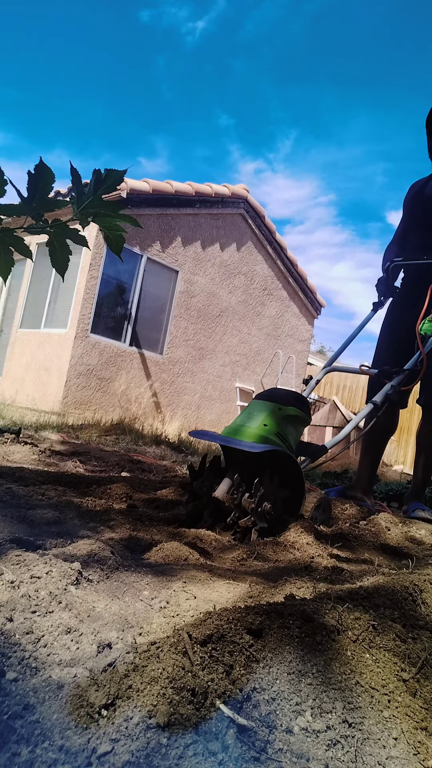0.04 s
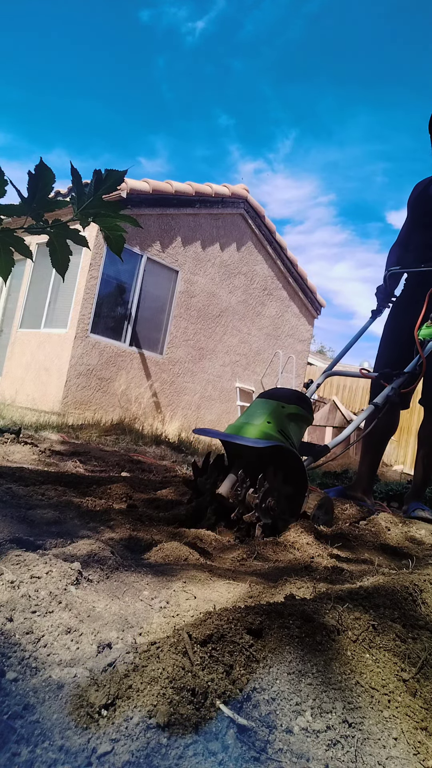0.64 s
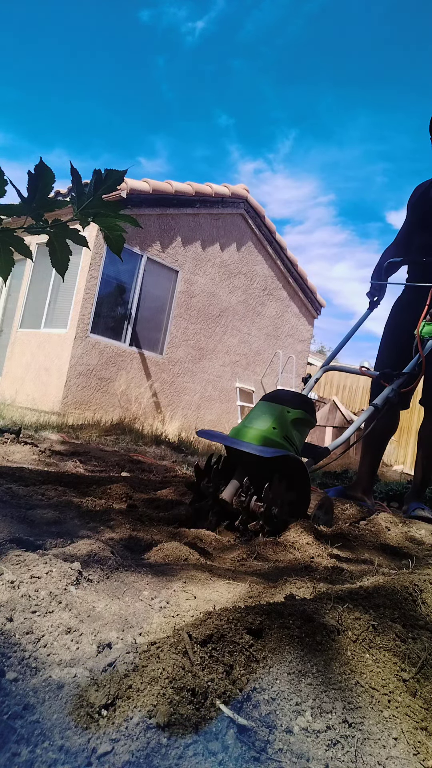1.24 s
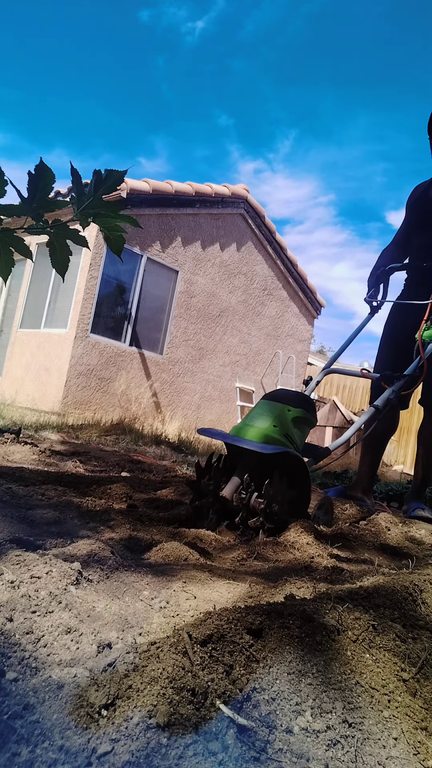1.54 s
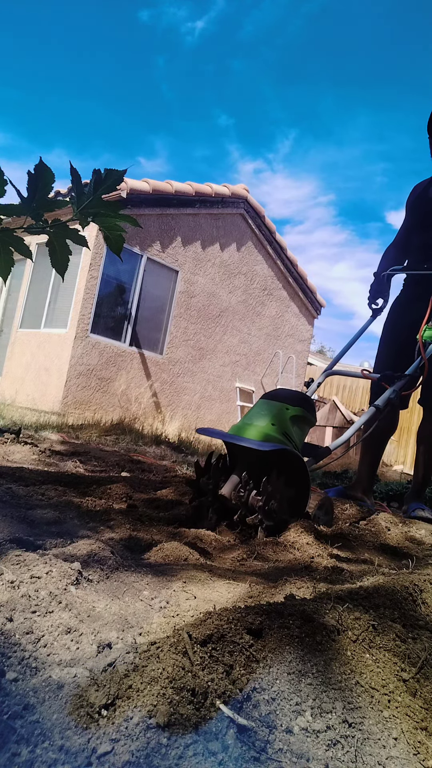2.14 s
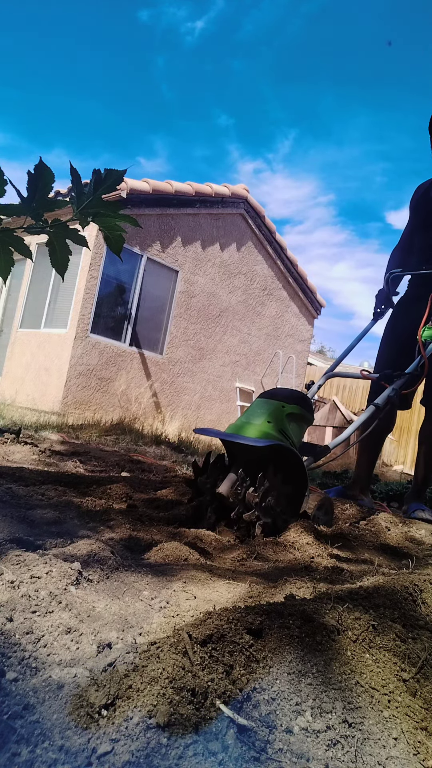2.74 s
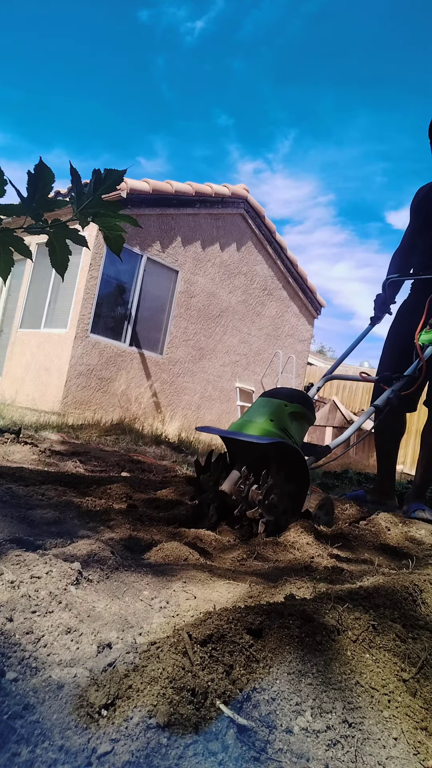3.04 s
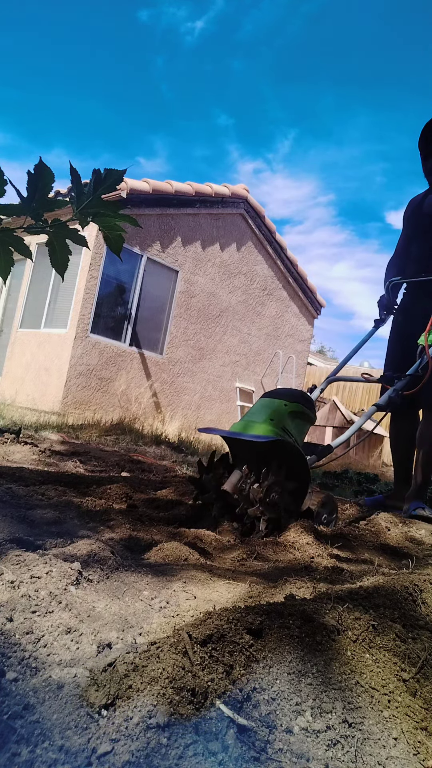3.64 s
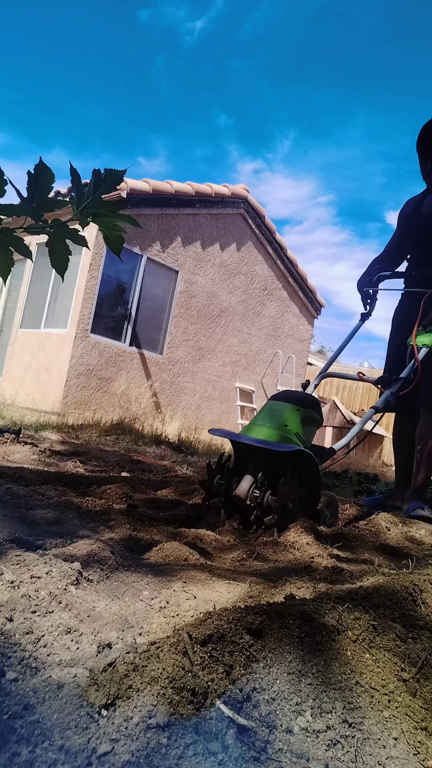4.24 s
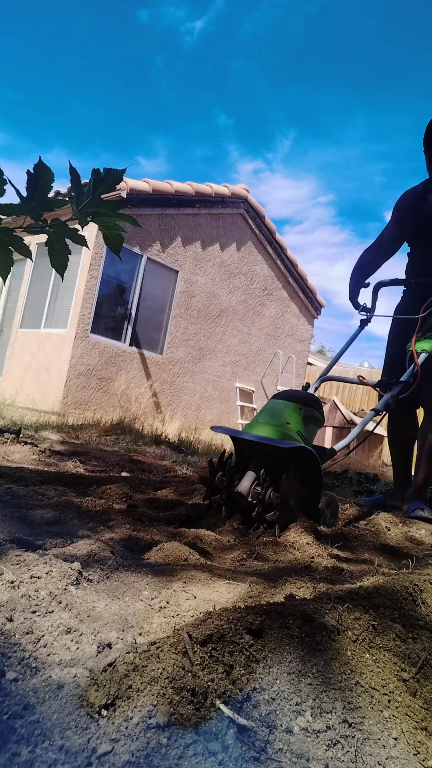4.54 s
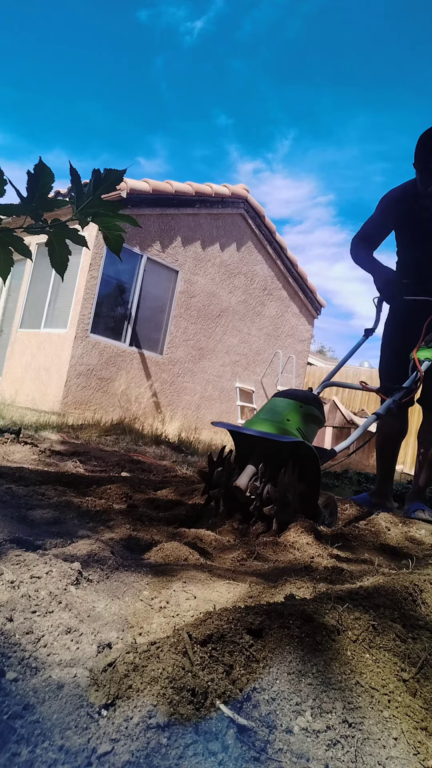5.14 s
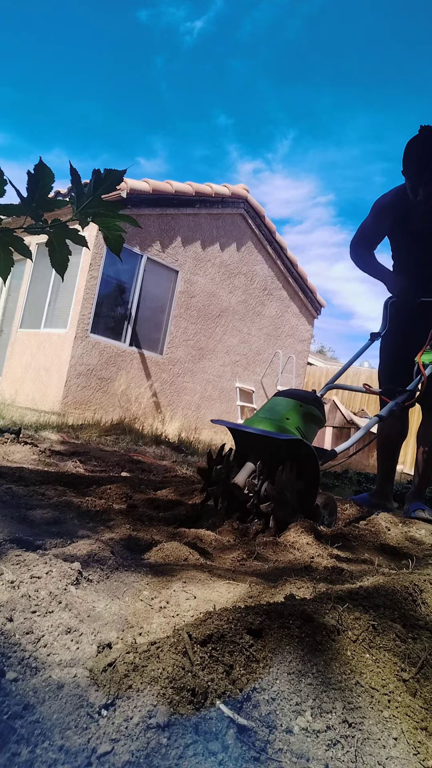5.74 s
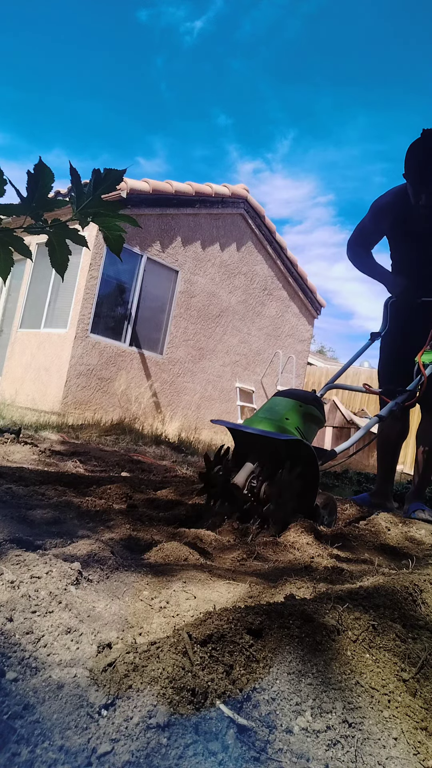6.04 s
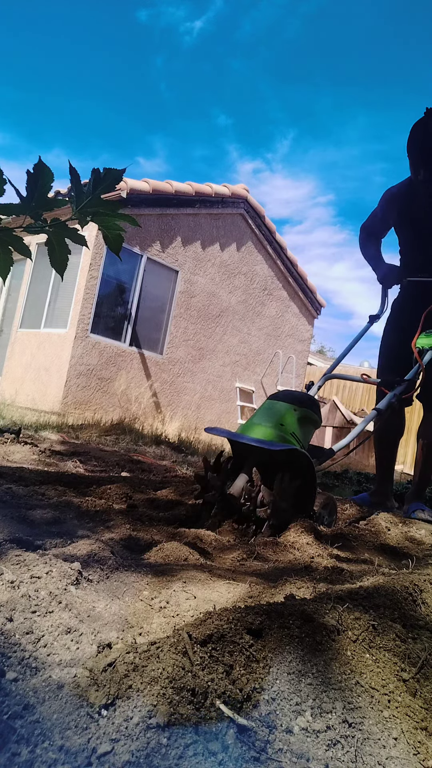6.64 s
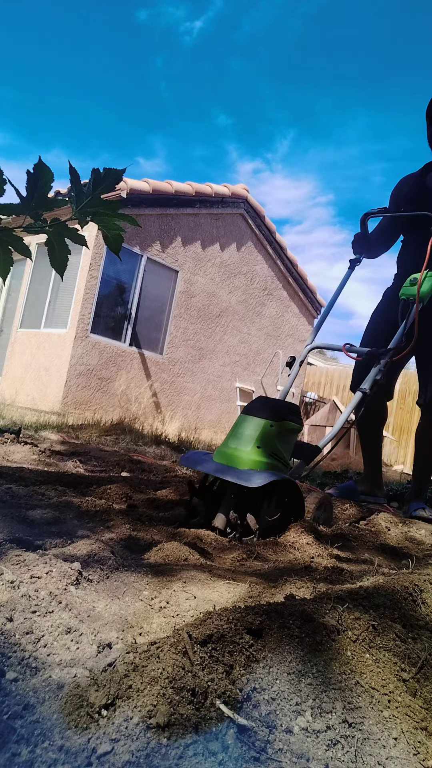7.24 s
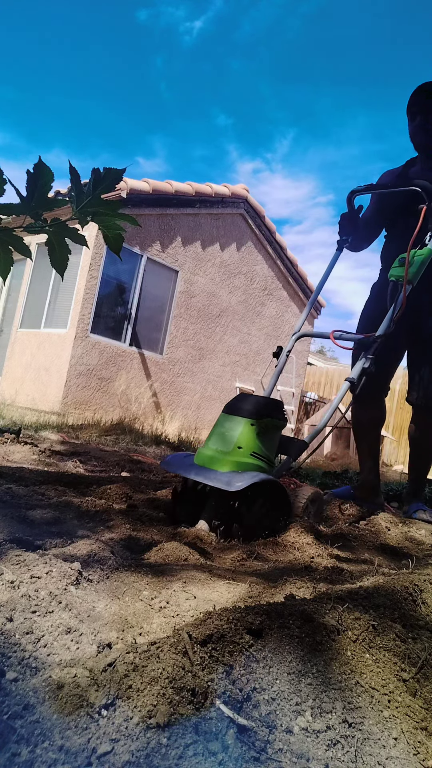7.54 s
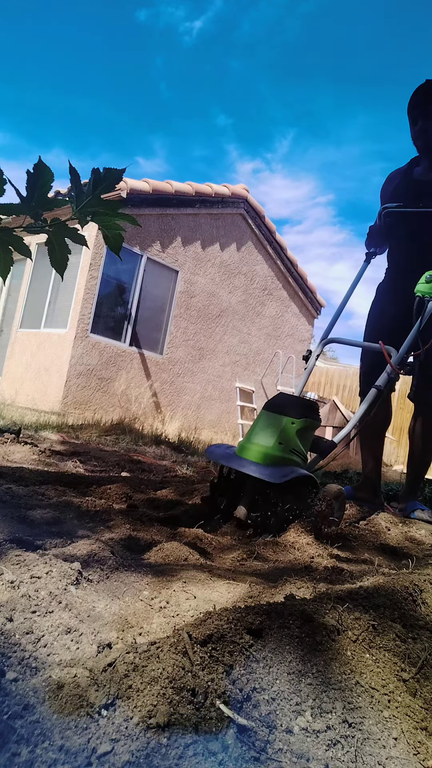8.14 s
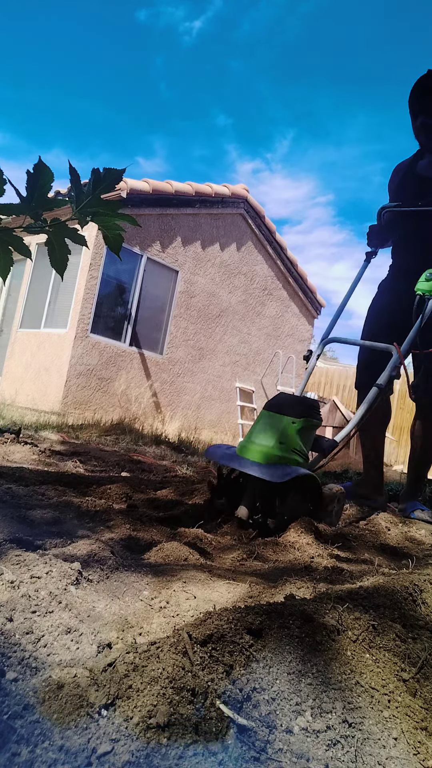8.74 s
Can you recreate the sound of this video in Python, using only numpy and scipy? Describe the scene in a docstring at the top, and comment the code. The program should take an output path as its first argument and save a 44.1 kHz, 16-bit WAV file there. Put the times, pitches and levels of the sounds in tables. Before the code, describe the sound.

Light ticks, ringing clanks and small squeaks come from the frame of a nearby garden tiller being moved on gritty soil, with a faint bird and a far low rumble behind. Then the electric motor starts suddenly, much louder, and winds up to a whine with chattering gears. Its pitch drops as it digs, with dull thuds, spraying dirt and a few sharp stone hits, outdoors in a yard.

```python
"""An electric tiller snaps on: its pinion whines up through the ring of the gear case, then sags as the
tines bite dry soil and throw grit. Before it starts, the machine is shifted about a backyard: contacts
set its frame ringing, soil crunches under it, and dry joints squeak by stick-slip friction.
A bird chirps, a distant town rumbles underneath, and walls and fence return a short echo."""
import sys
import numpy as np
from scipy import signal
from scipy.fft import rfft, irfft, next_fast_len
from scipy.io import wavfile
from scipy.ndimage import map_coordinates

SR = 44100
rng = np.random.default_rng(int(sys.argv[2]) if len(sys.argv) > 2 else 0)


def materialize(psi):
    """Save the field psi as 16-bit PCM at rate SR to the path in sys.argv[1].

    A 1-D psi becomes a single channel; in a 2-D psi each row is a channel.
    """
    bounded = np.clip(np.atleast_2d(psi).T, -1, 1)
    quanta = np.round(bounded * 32767).astype(np.int16)
    wavfile.write(sys.argv[1], SR, quanta)


N = 387190

# Likeness of the two ears: (frequency [Hz], coherence [0-1])
EAR_COHERENCE = [(400, 0.99), (700, 1), (1290, 0.23), (2380, 1), (3500, 1), (5000, 0.12), (8000, 0.63),
                 (14000, 0.033)]
# Balance of the ears: (frequency [Hz], left minus right [dB])
EAR_BALANCE = [(60, -5), (110, 3), (200, 0), (380, -1.5), (700, -5), (1290, -1.5), (2380, 0), (4400, 3),
               (8120, 1), (15000, -3)]
# Reverberation of the yard: (frequency [Hz], 60 dB decay time [s])
YARD_DECAY = [(200, 0.14), (3000, 0.19), (12000, 0.051)]

# Spectra of the noise sources: (frequency [Hz], relative level [dB])
TOWN_SPECTRUM = [(13, -68), (22, -30.5), (49, -4.5), (90, -4), (169, -4), (263, -11.5), (398, -16),
                 (432, -16.5), (1540, -39), (2140, -46.5), (2980, -47), (3810, -49.5), (8000, -67),
                 (16000, -80)]
SCRAPE_SPECTRUM = [(400, -31.5), (650, 3), (900, -6.5), (1250, 3.5), (1900, 1), (2600, 1), (3800, -2),
                   (5000, 0.5), (7500, -24), (14000, -36), (16000, -7.5)]
BUMP_SPECTRUM = [(100, -27.5), (200, -8), (280, 6), (400, -9.5), (600, -7), (900, -20), (2000, -35)]
CONTACT_SPECTRUM = [(500, -39.5), (1500, -9), (2600, -0.5), (4200, -4.5), (6000, -10.5), (7500, -8.5),
                    (12000, -19)]
KNOCK_SPECTRUM = [(200, -29.5), (600, -23.5), (1000, 7.5), (1400, -10), (2500, -2.5)]
SNAP_SPECTRUM = [(3000, -43.5), (6500, 6), (9000, 3.5), (12000, 1.5), (14500, 2), (16000, 10.5)]
GRIT_SPECTRUM = [(2350, -21.5), (4000, -2.5), (4870, -6), (5670, -6), (7230, -18.5), (8750, -10.5),
                 (9770, -17), (10600, -10), (12300, -14.5), (14000, -10), (16000, -12)]
THUD_SPECTRUM = [(70, -36), (120, -21.5), (170, -14.5), (220, 0), (280, -3), (340, -5), (600, -38.5)]
SPARK_SPECTRUM = [(7000, -35), (10500, -10), (12500, -8), (14500, 1), (16000, -5)]
HOOD_SPECTRUM = [(150, -47), (260, -16), (416, 1), (514, -7), (595, -5), (679, -14), (822, -11.5),
                 (938, -19.5), (1140, -17.5), (1500, -26.5), (1950, -50), (3300, -120)]
CHATTER_SPECTRUM = [(500, -46.5), (900, -3.5), (1150, -8.5), (1450, -10.5), (1900, -5), (2250, -2.5),
                    (2800, -5), (3400, 5), (3900, -11), (4800, -14), (5400, -15.5), (6400, -9),
                    (7300, -38.5), (12000, -55)]

# Resonances of far machinery and of the tiller: (frequency [Hz], bandwidth [Hz], relative level [dB])
DRONE_MODES = [(56.3, 3.5, -1.5), (128.6, 2.3, 4)]
FRAME_MODES = [(1330, 26, -2.5), (2480, 70, 0.5), (2700, 130, 0.5), (3050, 150, 5), (3520, 110, 2),
               (4450, 80, -14), (5500, 200, -2)]
HOOD_MODES = [(1020, 16, 1.5), (1100, 40, -5.5), (920, 46, 3), (1420, 70, -6), (605, 44, -5)]
HOUSING_MODES = [(735, 12, -3), (1171, 26, -6), (1610, 22, -4.5), (1786, 45, -9.5), (2172, 28, -5.5),
                 (2249, 29, -3.5), (2336, 28, -9.5), (2563, 32, -4.5), (2676, 70, -9.5), (2990, 11, -1.5),
                 (3204, 40, -6.5), (4106, 46, -5.5), (4530, 25, -7.5), (5230, 120, -14.5), (6470, 53, -14)]
GEAR_CASE_MODES = [(3540, 28, 26), (3605, 36, 21), (3605, 35, 16.5), (3430, 50, 13)]

# Bird chirps: (time [s], starting pitch [Hz], level [dB])
BIRD_CHIRPS = [(.668, 3650, -55.5), (0.8, 4100, -56), (4.945, 3900, -56)]
# Notes within a chirp: (delay [s], pitch [ratio], relative level [dB])
CHIRP_VOICES = [(0, 1, 1), (-.002, .87, 0), (-0.024, 1.44, -8), (-0.026, 1.29, -9)]
# Nearly level bird notes: (time [s], length [s], pitch [Hz], level [dB])
BIRD_PEEPS = [(.504, 0.024, 2127, -34.5), (2.785, 0.026, 2120, -54)]
# Slipping dry joints: (time [s], length [s], pitch [Hz], level [dB])
JOINT_SQUEAKS = [(1.281, 0.036, 1051, -34.5), (1.333, 0.045, 1044, -43), (1.43, 0.053, 1380, -47),
                 (1.884, 0.04, 4860, -37), (1.907, 0.074, 5280, -34.5), (1.938, 0.093, 5100, -36.5),
                 (1.99, 0.18, 4840, -52), (2.072, 0.14, 1815, -49), (2.144, 0.11, 2420, -41.5),
                 (2.15, 0.12, 3080, -48), (2.16, .09, 3760, -50), (2.235, 0.066, 2850, -43),
                 (2.17, 0.074, 1660, -48), (2.212, 0.14, 1297, -41), (3.881, 0.029, 1600, -47),
                 (4.229, 0.046, 1530, -52), (5.328, 0.17, 1373, -44), (5.35, 0.1, 2530, -46),
                 (5.42, 0.084, 676, -43)]
# Shoves over the soil: (peak time [s], 60 dB rise [s], 60 dB fall [s], crunch [dB], sand [dB])
SOIL_SHOVES = [(0.01, 0.18, 0.059, -38, -38), (1.19, 0.33, 0.55, -54, -61), (1.57, 0.093, 1.15, -48, -60),
               (2.3, 0.6, 0.31, -36, -65), (3.04, 0.84, 1.3, -58, -74), (3.53, 0.23, .25, -66, -66),
               (3.88, 0.85, 1, -57.5, -57), (4.26, 0.18, 0.19, -63.5, -51.5),
               (4.68, 0.54, 1.18, -44.5, -56), (5.27, 0.21, 0.2, -47, -83), (5.46, 0.21, 0.15, -30.5, -50)]
# The tines drop on the soil: (time [s], level [dB])
TINE_DROPS = [(2.35, -25), (4.677, -28), (5.467, -25)]
# Contacts on the frame, by handling and later by stones:
# (time [s], strength [dB], relative knock [dB], relative snap [dB], ring pitch [Hz], scuff length [s])
FRAME_CONTACTS = [(0.013, -23.5, -23, 3, 3090, 0.0039), (0.9057, -13.5, -39, -4.5, 2970, 0.0028),
                  (0.975, -30, -6, -14, 3440, .004), (1.023, -22, -31, -31, 3150, 0.017),
                  (1.041, -22, -25, -14, 2700, 0.0052), (1.295, -9, -14.5, -13, 2290, 0.0012),
                  (1.407, -24.5, -38, -16, 2710, .003), (1.469, -36, -33, -16, 2260, 0.0035),
                  (1.562, -35, -25, -20, 3100, .003), (1.596, -9.5, -32, -3, 3470, 0.01),
                  (1.6047, -5, -21, -32, 2563, 0.014), (1.6855, -13.5, -14, -2.5, 3460, 0.014),
                  (1.706, -15.5, -23, -24, 2970, .005), (1.7692, -14.5, -12.5, -16, 2990, 0.0084),
                  (1.791, -22.5, -30, -25, 3650, 0.0045), (2.23, -15, -28, -13, 2700, 0.002),
                  (2.256, -11.5, -13, -5, 2990, 0.00088), (2.306, -14.5, -6, 0, 2800, 0.0008),
                  (2.337, -12.5, -11, -15, 3010, 0.01), (2.3517, -8.5, -30, -22, 2535, .006),
                  (3.184, -25.5, -35, -19, 2470, .005), (3.2182, -13, -24, -19, 2750, 0.0033),
                  (3.444, -38.5, -40, -20, 3830, 0.01), (4.025, -27.5, -32, -17, 3050, 0.0046),
                  (4.05, -22, -38, -17, 2250, .004), (4.0604, -20, -30, -17, 2530, 0.0085),
                  (4.1, -22.5, -12, 1.5, 2700, 0.0039), (4.143, -30.5, -35, -23, 3150, 0.013),
                  (4.376, -28.5, -39, -17, 2360, 0.011), (4.52, -6.5, -16, -16.5, 3090, 0.0075),
                  (4.532, -0.5, -9.5, -29, 4020, 0.015), (4.545, -5, -12.5, -25, 2870, 0.013),
                  (4.629, -16, -11, -2, 3400, 0.016), (4.646, -12, -20, 0, 2980, 0.018),
                  (4.677, -5, -11, -14.5, 2850, 0.0034), (4.737, -12.5, -22, -1.5, 2570, 0.015),
                  (4.765, -24.5, -30, -25, 3000, 0.0054), (4.823, -18, -33, 0.5, 3580, 0.014),
                  (4.868, -25, -25, -20, 2990, 0.0054), (4.885, -24, -25, -25, 3600, 0.0066),
                  (5.1381, -14.5, -28.5, -31, 2570, 0.0062), (5.197, -26.5, -35, -17, 3000, 0.0055),
                  (5.235, -18.5, -38, -10, 3400, 0.0019), (5.271, -33, -30, -28, 2080, 0.011),
                  (5.3994, -8, -37, -2, 2510, 0.0044), (5.469, -12, -16, -21, 2860, 0.0079),
                  (5.91, -9, -19, -13, 3660, 0.0076), (7.212, -0.5, -25, -10, 3740, .02),
                  (8.107, 1, -25, -10, 3270, .02), (8.616, 1, -29, -2.5, 3550, 0.033)]
# Modes of a struck part: (multiple of its ring pitch [ratio], level [dB], 60 dB decay time [s])
PART_MODES = [(.56, -9.5, 0.055), (1, -0.5, 0.047), (1.27, 2, 0.017), (1.68, 3, 0.015), (2.15, -9, 0.02)]
# Tines strike clods: (time [s], half-width [s], thud boost [dB], gear knock boost [dB], hood boost [dB])
CLOD_STRIKES = [(6.424, 0.033, 9.5, 3.5, -5), (7.28, 0.033, 2, 5, 1.5), (7.625, 0.095, 4, 11.5, -1),
                (7.99, 0.15, 1.5, 12.5, -1), (8.667, 0.11, 7.5, 2.5, 1.5)]
# Magnetic hum of the stator: (frequency [Hz], level [dB])
HUM_PARTIALS = [(359.6, -28), (484.3, -37), (120, -59)]
# How the housing radiates the pinion's whine: (frequency [Hz], gain [dB])
WHINE_RESPONSE = [(1950, -36), (2130, -30), (2240, -15.5), (2345, -13.5), (2430, -25), (2600, -21.5),
                  (2790, -25.5), (2980, -21), (3150, -21.5), (3400, -23), (3530, -13.5), (3620, -17),
                  (3730, -33)]
# The motor spins up freely, then sags as the tines dig in: (time [s], speed [turns/s])
SHAFT_SPEED = [(5.92, 262), (6.1, 322), (6.2, 368), (6.3, 405), (6.5, 450), (6.7, 480), (6.85, 488),
               (7.0, 488), (7.15, 483), (7.3, 466), (7.46, 446), (7.6, 408), (7.75, 393), (7.9, 408),
               (8.02, 403), (8.14, 391), (8.5, 384), (8.69, 343), (8.78, 329)]
# Growth with shaft speed: (part [name], rise per doubling [dB])
DB_PER_DOUBLING = {"chatter": 6.5, "case": 8.5, "thud": 13.5, "grit": 10.5, "knock": 15}

START_S, SKIM_S, DIG_S = 5.918, 6.79, 7.25  # the switch closes; the tines touch the soil; they dig in
PINION_TEETH, RUNNING_HZ, TORQUE_PULSE_HZ = 7, 453, 120  # the torque pulses every mains half cycle


def amp(db):
    """Amplitude grows tenfold every 20 dB."""
    return 10 ** (np.asarray(db) / 20)


def unit(x):
    """Normalisation to an rms of 1."""
    return x / np.sqrt(np.mean(x ** 2) + 1e-20)


def clock():
    """Uniform sampling: the time of each sample in seconds."""
    return np.arange(N) / SR


def along(points, hz):
    """Interpolation of (frequency, value) points on a logarithmic frequency axis."""
    f, v = np.transpose(sorted(points))
    return np.interp(np.log(hz + 1), np.log(f + 1), v)


def wobble(rate):
    """Smooth random modulation with rate knots a second."""
    knots = rng.standard_normal(int(N * rate / SR) + 4)
    return map_coordinates(knots, [np.arange(N) * rate / SR])


def swell(s, rise, fall):
    """Exponential growth and decay about a peak at s; rise and fall are the times for 60 dB."""
    t = clock() - s
    return amp(-60 * np.minimum(np.maximum(-t / rise, t / fall), 2))


def impacts(rate, spread_db):
    """Shot noise: two independent trains of random impacts with log-normal sizes."""
    hit = rng.random((2, N)) < rate / SR
    return unit(hit * rng.choice([-1, 1], (2, N)) * amp(spread_db * rng.standard_normal((2, N))))


def filtered(x, response):
    """Linear filtering: the spectrum of x is multiplied by a frequency response."""
    size = next_fast_len(N + SR // 4, True)
    return irfft(rfft(x, size) * response(np.fft.rfftfreq(size, 1 / SR)), size)[..., :N]


def coloured(x, spectrum, size=2048):
    """Minimum-phase filtering: a causal kernel of unit energy imposes the spectrum."""
    level_db = np.maximum(along(spectrum, np.fft.rfftfreq(size, 1 / SR)), -90)
    cepstrum = irfft(np.log(amp(level_db)))
    cepstrum[1:size // 2] *= 2
    cepstrum[size // 2 + 1:] = 0
    kernel = irfft(np.exp(rfft(cepstrum)))
    return signal.oaconvolve(x, kernel[None] / np.linalg.norm(kernel), axes=1)[:, :N]


def resonate(x, modes):
    """Modal superposition: x drives damped resonators in parallel, at unit energy gain."""
    def response(f):
        h = sum(amp(db) * 1j * f * width / (hz * hz - f * f + 1j * f * width) for hz, width, db in modes)
        return h / np.sqrt(np.mean(np.abs(h) ** 2))
    return filtered(x, response)


def resonance(hz, centre_hz, width_hz):
    """Forced response of a single mode, 1 at its centre."""
    return 1 / np.hypot(1, 2 * (hz - centre_hz) / width_hz)


def placed(pair, left_lag_s):
    """Interaural coherence, level and delay turn two signals into the tiller's stereo image."""
    def mid_side_gains(hz):
        turn = np.arccos(np.clip(along(EAR_COHERENCE, hz), 0, 1)) / 2
        return np.array([np.cos(turn), np.sin(turn)])

    def ear_gains(hz):
        ear = np.array([[.5], [-.5]])
        return amp(along(EAR_BALANCE, hz) * ear) * np.exp(-2j * np.pi * hz * left_lag_s * ear)

    mid, side = filtered(pair, mid_side_gains)
    return filtered(np.array([mid + side, mid - side]), ear_gains)


def town():
    """Long waves reach both ears nearly alike: a far rumble with a low drone of machinery."""
    noise = rng.standard_normal((4, N))
    air = filtered(noise[:3], lambda hz: amp(along(TOWN_SPECTRUM, hz)))
    diffuse = filtered(air[1:], lambda hz: along([(100, 0.096), (600, 0.34), (3000, 1.0)], hz))
    rumble = amp(-39.5 + wobble(3.78)) * unit(air[0] + diffuse)
    return rumble + amp(-50.5) * unit(resonate(noise[3], DRONE_MODES))


def yard_echo(x):
    """Reverberation: reflections from walls and fence merge into a short, exponentially fading tail."""
    hz, t, noise = signal.stft(rng.standard_normal((2, SR // 2)), SR, nperseg=256)
    tail = signal.istft(noise * amp(-60 * t / along(YARD_DECAY, hz)[:, None]), SR, nperseg=256)[1]
    tail = np.pad(tail, ((0, 0), (SR // 200, 0)))  # 5 ms of travel
    return signal.fftconvolve(x, tail / np.linalg.norm(tail[0]), axes=1)[:, :N]


def whistles(notes, fall, rough):
    """Frequency modulation: each note starts level, then bends ever faster by the share fall."""
    song = np.zeros(N)
    waver = 1 + rough * wobble(900)
    for s, length, hz, db in notes:
        u = np.linspace(0, 1, max(round(length * SR), 2))
        span = round(s * SR) + np.arange(len(u))
        pitch = hz * (1 - fall * u ** 3) * waver[span]
        song[span] += amp(db) * unit(u * (1 - u)) * np.sin(2 * np.pi * np.cumsum(pitch) / SR)
    return np.array([song, song])


def bird(chirp_s=.066):
    """Superposed glides: a chirp is two falling notes just behind a fainter, higher pair; peeps rise."""
    notes = [(s + delay, chirp_s, hz * ratio, db + voice_db)
             for s, hz, db in BIRD_CHIRPS for delay, ratio, voice_db in CHIRP_VOICES]
    chirps = unit(amp(4 * wobble(250))) * whistles(notes, fall=.25, rough=.04)
    return chirps + whistles(BIRD_PEEPS, fall=-.05, rough=.025)


def squeaks(sag=0.034):
    """Stick-slip friction in dry joints: an unsteady tone over a rasp, richer when it is louder."""
    tone, rub = np.zeros((2, N))
    waver = wobble(900)
    for s, length, hz, db in JOINT_SQUEAKS:
        u = np.linspace(0, 1, max(round(length * SR), 2))
        span = round(s * SR) + np.arange(len(u))
        scatter_hz = (35 + .032 * hz) * waver[span]  # the pitch varies from slip to slip
        phase = 2 * np.pi * np.cumsum(hz * (1 - sag * u) + scatter_hz) / SR
        level = amp(db) * unit(u * (1 - u) ** 2)
        overtones = amp(19.5) * level * (np.sin(2 * phase) + amp(-9) * np.sin(3 * phase))
        tone[span] += level * (np.sin(phase) + overtones)
        rub[span] += level
    rasp = unit(coloured(impacts(900, 2.1), SCRAPE_SPECTRUM) + resonate(impacts(900, 2.8), FRAME_MODES))
    return (tone + amp(-12) * rub * rasp) * unit(amp(5 * wobble(260)))


def crumbling(relative_db=-40, t60=0.25):
    """Exponential energy decay: the envelope of the crumbs that each contact shakes loose."""
    energy = np.zeros(N)
    for s, db, *_ in FRAME_CONTACTS:
        energy[round(s * SR)] += amp(db + relative_db) ** 2
    retained = amp(-60 / (t60 * SR)) ** 2
    return np.sqrt(signal.lfilter([1], [1, -retained], energy))


def dragging():
    """Granular noise: soil crunches under shoves and contacts, sand trickles, the tines bump down."""
    crumbs = amp(2.6 * wobble(56)) * impacts(1500, 2.6)
    crunch = amp(2) * unit(coloured(crumbs, SCRAPE_SPECTRUM))
    crunch += amp(-6.5) * unit(resonate(crumbs, FRAME_MODES))
    sand = unit(coloured(impacts(2500, 2.5), SNAP_SPECTRUM))
    shoved, trickle = sum(np.outer(amp(levels_db), swell(s, rise, fall))
                          for s, rise, fall, *levels_db in SOIL_SHOVES)
    shaken = crumbling()
    drops = sum(amp(db) * swell(s, 0.0017, 0.13) for s, db in TINE_DROPS)
    bumps = drops * unit(coloured(impacts(4000, 0.82), BUMP_SPECTRUM))
    soil = np.hypot(shoved, shaken) * crunch + (trickle + amp(-7.5) * shaken) * sand + bumps
    return placed(soil, left_lag_s=-68e-6) * amp([[-1], [1]])


def contact_force(t, scuff_s, sharp_s=0.0035, rattle_t60=0.042):
    """Frictional impact: a burst of tiny slips and a fading rattle, with a crack if it is brief."""
    u = 3 * t / scuff_s
    envelope = u * np.exp(1 - u) + 0.08 * amp(-60 * t / rattle_t60) * (1 - np.exp(-u))
    slips = envelope * rng.standard_normal((2, len(t)))
    slips *= amp(3.5 * rng.standard_normal(len(t) // 16 + 1).repeat(16)[:len(t)])
    crack = 0.49 * np.exp(-scuff_s / sharp_s) * (t == t[np.argmax(envelope)])
    return slips / np.linalg.norm(slips, axis=1, keepdims=True) + crack


def clicks(mode_spread=.09):
    """Impact excitation: each contact rings the modes of the struck part, the frame and the hood."""
    t = np.arange(SR // 5) / SR
    tracks = np.zeros((4, 2, N + SR))
    ratio, mode_db, t60 = np.transpose(PART_MODES)[:, :, None]
    for s, db, knock_db, snap_db, ring_hz, scuff_s in FRAME_CONTACTS:
        blow = amp(db + 12) * contact_force(t, scuff_s)
        # the side modes differ from part to part
        hz = ring_hz * ratio * (1 + mode_spread * (ratio != 1) * rng.standard_normal(ratio.shape))
        part = np.sum(amp(mode_db - 60 * t / t60) * np.sin(2 * np.pi * hz * t), axis=0)
        rung = signal.fftconvolve(blow, part[None] / np.linalg.norm(part), axes=1)[:, :len(t)]
        onset = round(s * SR)
        tracks[:, :, onset:onset + len(t)] += [blow, amp(knock_db) * blow, amp(snap_db) * blow, rung]
    blows, knocks, snaps, parts = tracks
    ring = amp(-12.5) * resonate(blows, FRAME_MODES) + amp(-4.5) * parts[:, :N]
    knock = amp(5.5) * coloured(knocks, KNOCK_SPECTRUM) + amp(-1.5) * resonate(knocks, HOOD_MODES)
    click = amp(-7) * coloured(blows, CONTACT_SPECTRUM) + amp(6.5) * coloured(snaps, SNAP_SPECTRUM)
    return placed(ring + knock + click, left_lag_s=-68e-6) * amp([[-1.5], [1.5]])


def by_load(free, skimming, digging, settle_s=.04):
    """Three states of load, joined by ramps: the tines run free, skim the soil, then dig."""
    touched, dug = (np.clip((clock() - s) / settle_s + .5, 0, 1) for s in (SKIM_S, DIG_S))
    return free + (skimming - free) * touched + (digging - skimming) * dug


def spin_db(part, shaft_hz):
    """A power law: the level of a part rises with shaft speed, from 0 dB at running speed."""
    return DB_PER_DOUBLING[part] * np.log2(shaft_hz / RUNNING_HZ)


def clod_boosts():
    """Transient loading: each clod swells the thud, gear knock and hood in a Gaussian pulse of dB."""
    return sum(np.outer(boosts_db, np.exp(-((clock() - s) / half_width) ** 2))
               for s, half_width, *boosts_db in CLOD_STRIKES)


def brush_sparks():
    """Arcing at the brushes: a high crackle that fades as the motor gains speed."""
    return amp(-29) * swell(6.05, rise=0.89, fall=2.5) * unit(coloured(impacts(6000, 2), SPARK_SPECTRUM))


def digging(age, shaft_hz, clod_db):
    """Random impacts: the tines thud through clods and fling sprays of grit against the hood."""
    spray = amp(1.4 * wobble(60)) * (impacts(3500, 2.1) + 0.18 * impacts(120, 2))
    airborne = 1 - np.exp(-age / 0.2)
    grit_db = by_load(-28, -22.5, -19) + spin_db("grit", shaft_hz)
    thud_db = by_load(-30.5, -32.5, -26.5) + spin_db("thud", shaft_hz) + clod_db
    grit = airborne * amp(grit_db) * unit(coloured(spray, GRIT_SPECTRUM))
    return grit + amp(thud_db) * unit(coloured(impacts(600, 2.4), THUD_SPECTRUM))


def stator_hum(age):
    """Magnetic forces make the stator hum, loudest during the inrush of current."""
    inrush = 1 + 1.45 * np.exp(-age / 0.35)
    hum = sum(amp(db + 2 * wobble(10)) * np.sin(2 * np.pi * hz * clock() + .7 * wobble(18))
              for hz, db in HUM_PARTIALS)
    return np.sqrt(2) * inrush * hum


def hood_drumming(boost_db):
    """Panel radiation: the sheet hood over the tines drums under dense small impacts."""
    return amp(by_load(-19.5, -18.5, -16) + boost_db) * unit(coloured(impacts(2000, 2.26), HOOD_SPECTRUM))


def unbalance(angle, shaft_hz, boost_db):
    """Forced vibration: unbalance shakes the hood once a turn, through a resonance the soil damps."""
    level = amp(by_load(-10, -18.5, -17.5) + boost_db + 0.6 * wobble(25))
    hood = resonance(shaft_hz, centre_hz=424.6, width_hz=25)
    return level * hood * (np.sin(angle) + 0.055 * np.sin(2 * angle))


def gear_knock(angle, shaft_hz, clod_db):
    """A subharmonic: the loaded gears knock every second turn; a panel picks up the third harmonic."""
    stumble = .3 * wobble(30)
    panel = amp(2.5) * resonance(1.5 * shaft_hz, centre_hz=580, width_hz=36)
    level_db = by_load(-36.5, -28, -30.5) + spin_db("knock", shaft_hz) + clod_db + 2.5 * wobble(22)
    return amp(level_db) * (np.sin(angle / 2 + stumble) + panel * np.sin(1.5 * angle + 2 * stumble))


def backlash(angle, shaft_hz, jolt_db):
    """Backlash impacts, bunched by each turn and torque pulse, rattle the housing and ring the case."""
    pulsing = 1 + 0.06 * np.cos(2 * np.pi * TORQUE_PULSE_HZ * clock())
    bunching = (1 + 0.12 * np.cos(angle)) * pulsing * amp(0.95 * wobble(55))
    chatter = amp(-3.5) * unit(coloured(bunching * impacts(5000, 3.5), CHATTER_SPECTRUM))
    chatter += amp(-6) * unit(resonate(bunching * impacts(3000, 6), HOUSING_MODES))
    chatter_db = by_load(-16, -16.5, -17) + spin_db("chatter", shaft_hz) + 0.53 * jolt_db
    churn_db = by_load(2, 1.5, 3.5) * wobble(28)  # the ring comes and goes, most under load
    case_db = by_load(-18, -20, -23) + spin_db("case", shaft_hz) + jolt_db + churn_db
    case = unit(resonate(bunching * impacts(2500, 2), GEAR_CASE_MODES))
    return amp(chatter_db) * chatter + amp(case_db) * case


def pinion_whine(angle, ripple_rad=1.15):
    """Gear meshing: a tone at the tooth rate glides through the resonances of the housing."""
    mesh = PINION_TEETH * angle + by_load(.45, .45, .8) * wobble(400)  # the teeth meet unevenly
    swing = ripple_rad * np.sin(2 * np.pi * TORQUE_PULSE_HZ * clock())  # torque pulses add sidebands
    tone = np.array([amp(2.6 * wobble(140)) * np.sin(mesh + swing + 0.27 * wobble(90)) for _ in range(2)])
    radiated = filtered(unit(tone), lambda hz: amp(along(WHINE_RESPONSE, hz)))
    octave = filtered(np.sin(2 * mesh), lambda hz: resonance(hz, centre_hz=5680, width_hz=330))
    return amp(by_load(-2, -1.5, -3.5)) * (radiated + amp(-31) * octave)


def tiller(switch_s=0.0016):
    """Rotating machinery: once the switch closes, one shaft sets the pitch of whine, shake and knock."""
    age = np.maximum(clock() - START_S, 0)
    shaft_hz = np.interp(clock(), *np.transpose(SHAFT_SPEED))
    angle = 2 * np.pi * np.cumsum(shaft_hz * (1 + .003 * wobble(35))) / SR
    jolt_db = 14.5 * np.exp(-age / 0.028)  # the motor's first kick shakes hood and gear case
    thud_db, knock_db, hood_db = clod_boosts()
    machine = pinion_whine(angle) + backlash(angle, shaft_hz, jolt_db)
    machine += hood_drumming(hood_db + 0.44 * jolt_db)
    machine[0] += (unbalance(angle, shaft_hz, 0.6 * knock_db)  # low tones feed only the mid signal
                   + gear_knock(angle, shaft_hz, knock_db) + stator_hum(age))
    machine += digging(age, shaft_hz, thud_db) + brush_sparks()
    power = np.clip(age / switch_s, 0, 1)
    return placed(power * machine, left_lag_s=40e-6)


def scene():
    """Superposition: the direct sounds, their reflections in the yard, and the town."""
    handling = clicks() + dragging() + squeaks()
    song = bird()
    machine = tiller()
    echo = yard_echo(amp(-15.5) * machine + amp(-11.5) * handling + amp(-11) * song)
    return machine + handling + song + echo + town()


def record(dry):
    """Soft saturation rounds the loudest peaks, and a low-pass filter limits the band."""
    ceiling, top_hz = .88, 15900
    rounded = dry / (1 + np.abs(dry / ceiling) ** 6) ** (1 / 6)
    return filtered(rounded, lambda hz: np.clip((top_hz - hz) / 400 + .5, 0, 1))


dry = scene()
out = record(dry)
materialize(out)
```